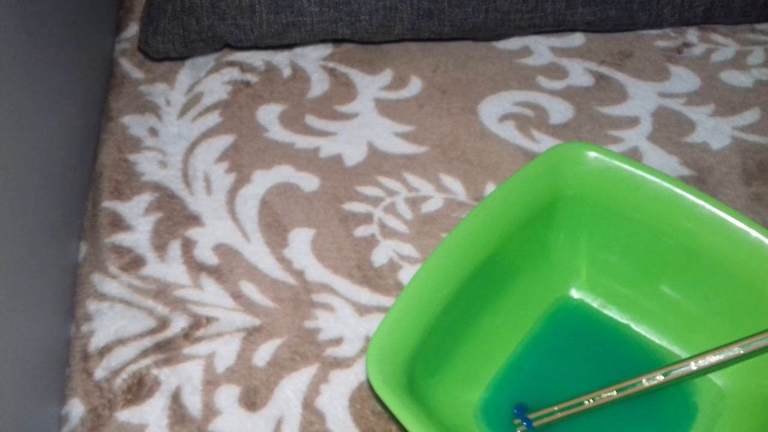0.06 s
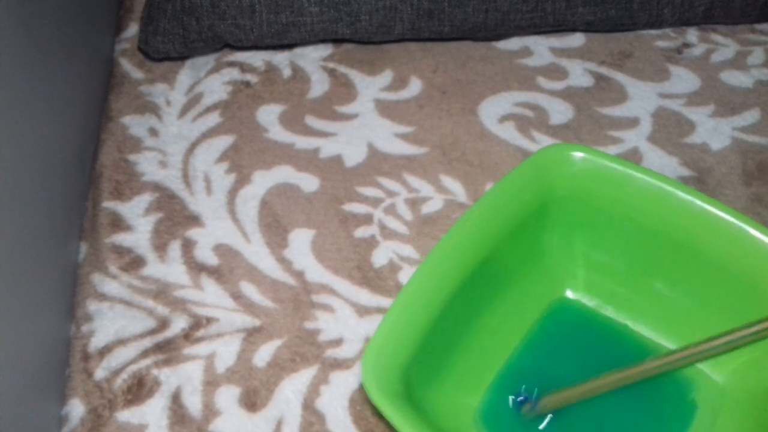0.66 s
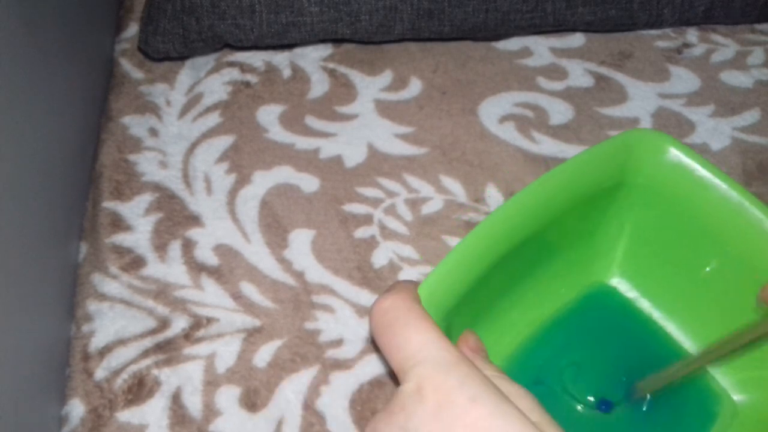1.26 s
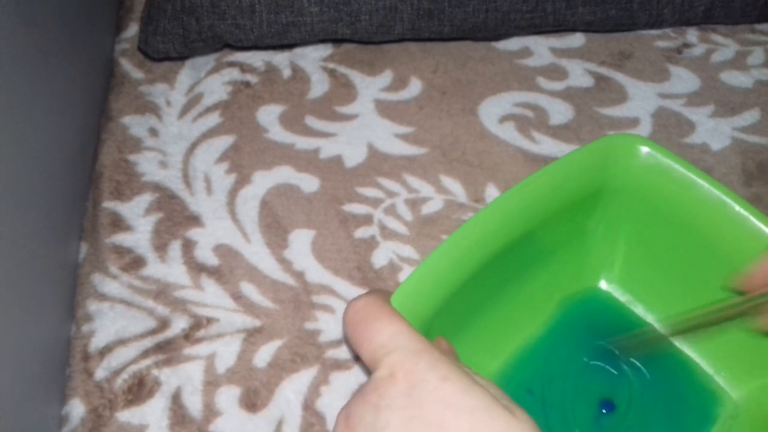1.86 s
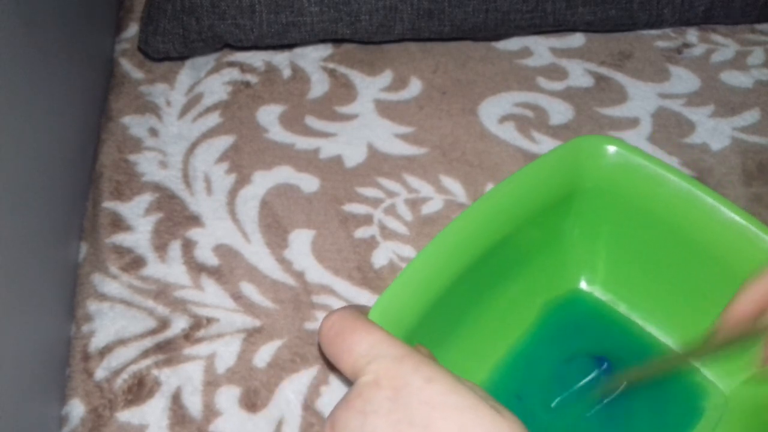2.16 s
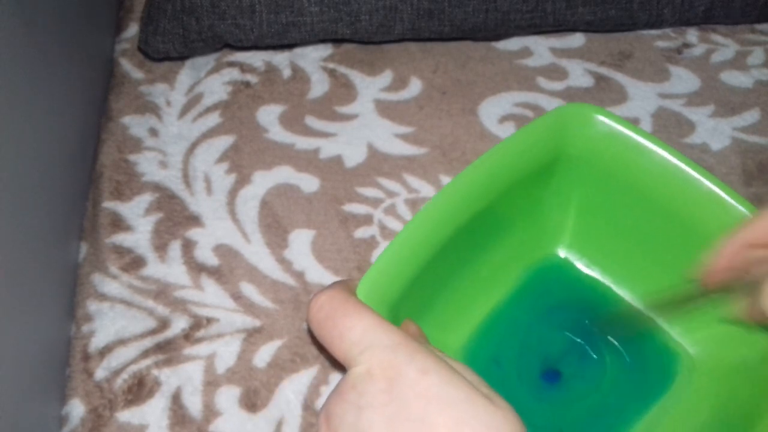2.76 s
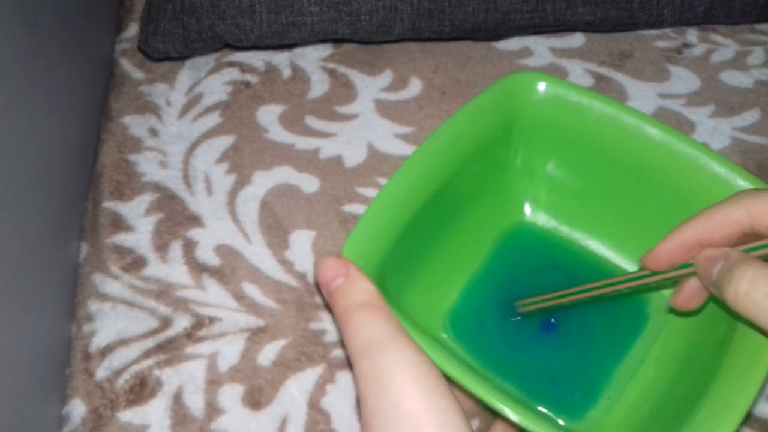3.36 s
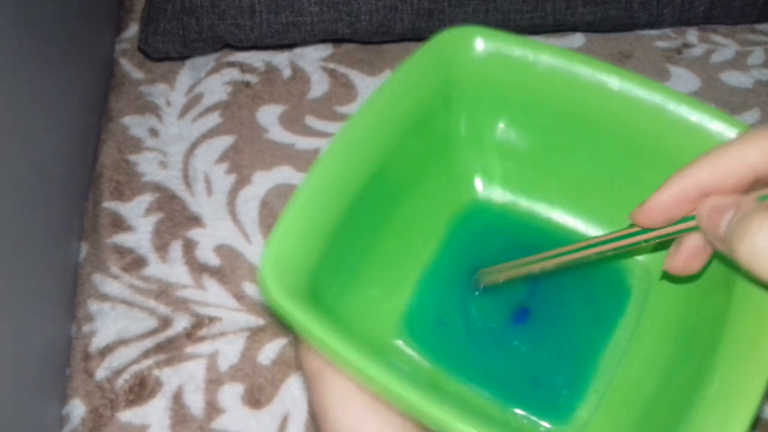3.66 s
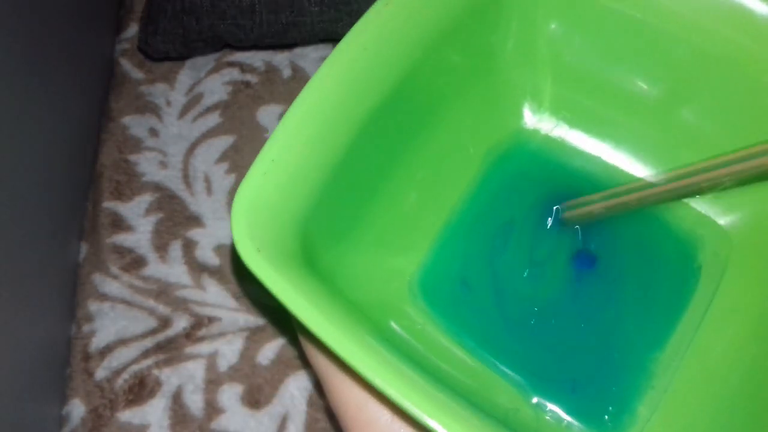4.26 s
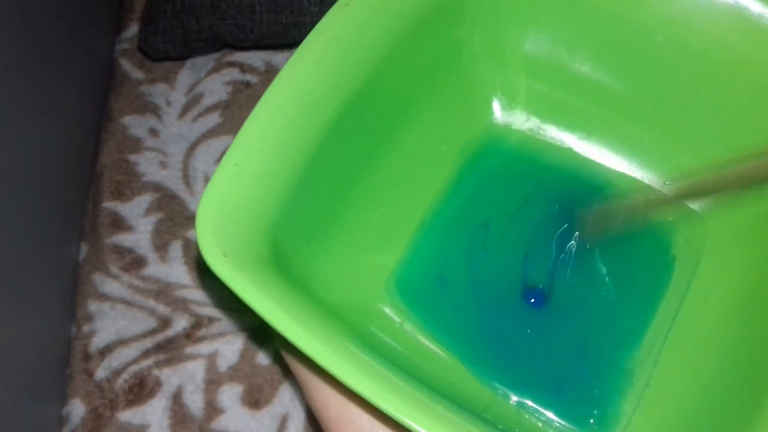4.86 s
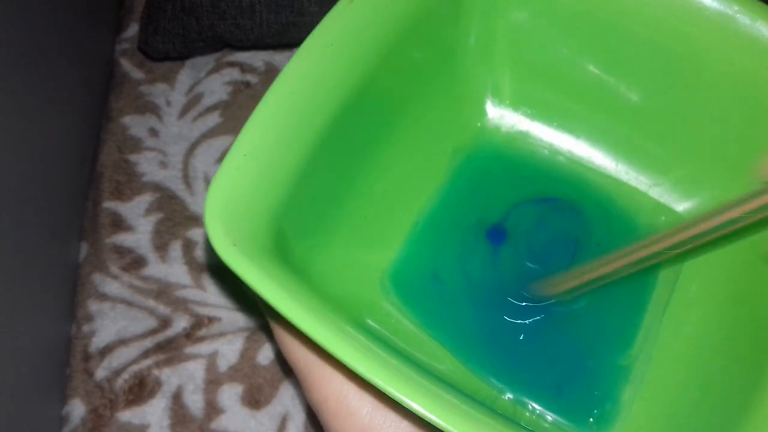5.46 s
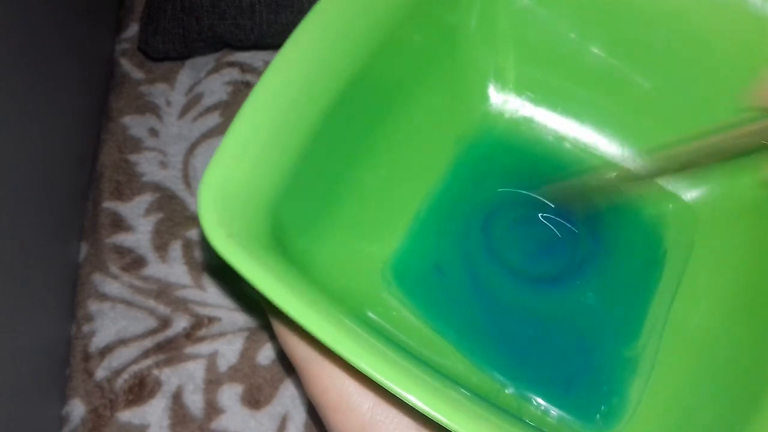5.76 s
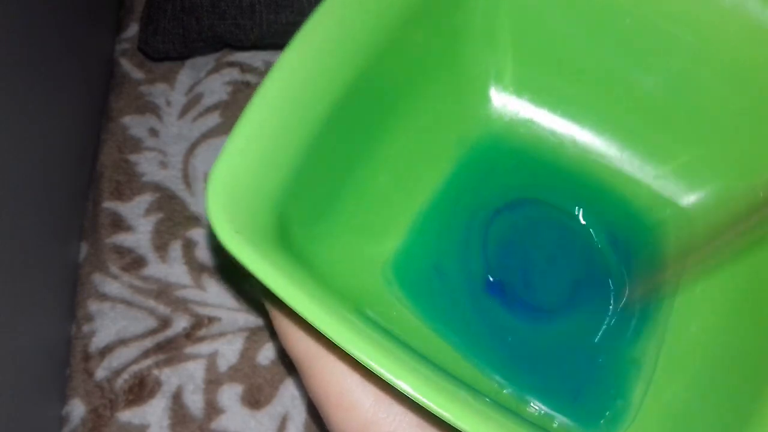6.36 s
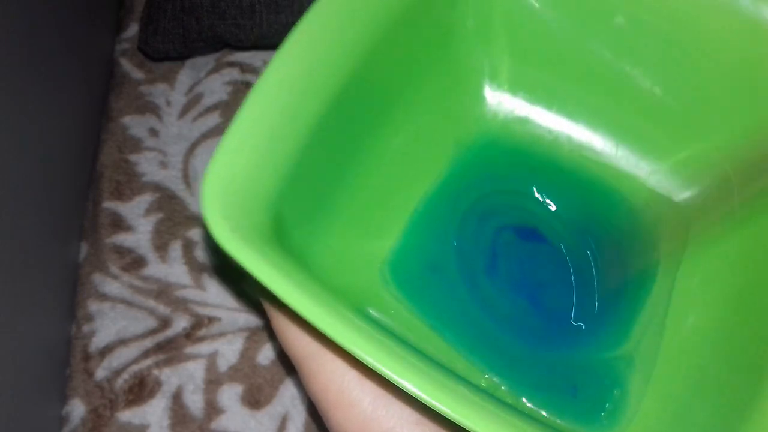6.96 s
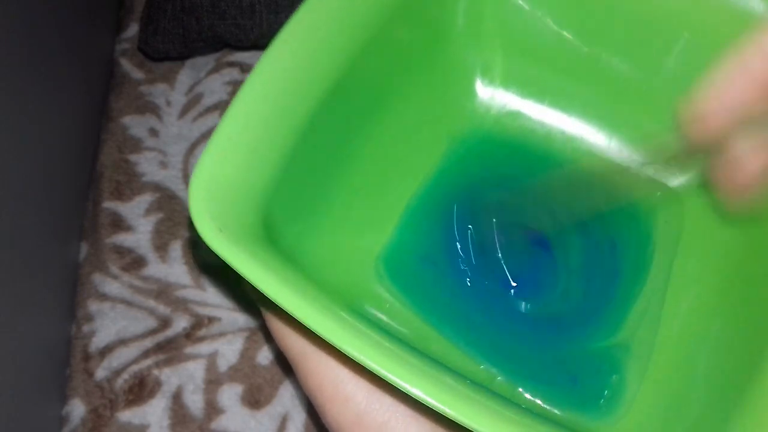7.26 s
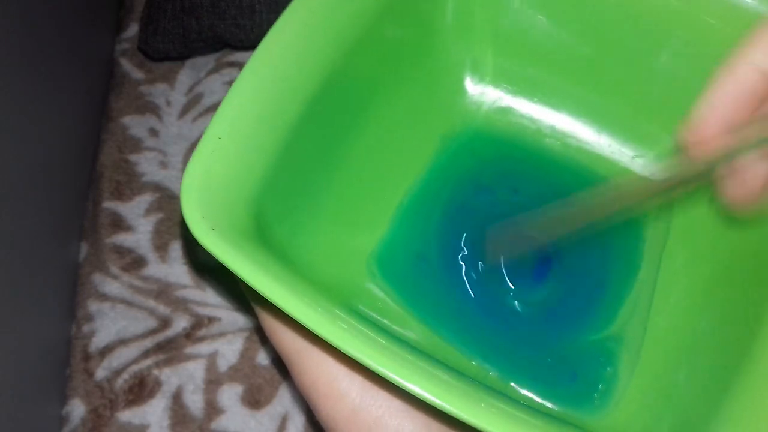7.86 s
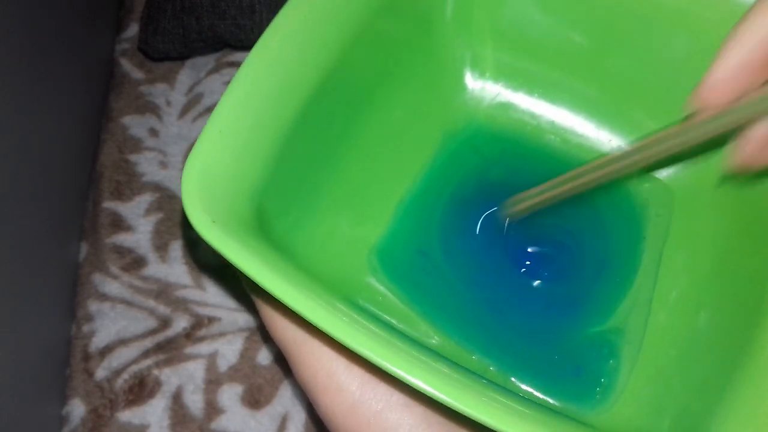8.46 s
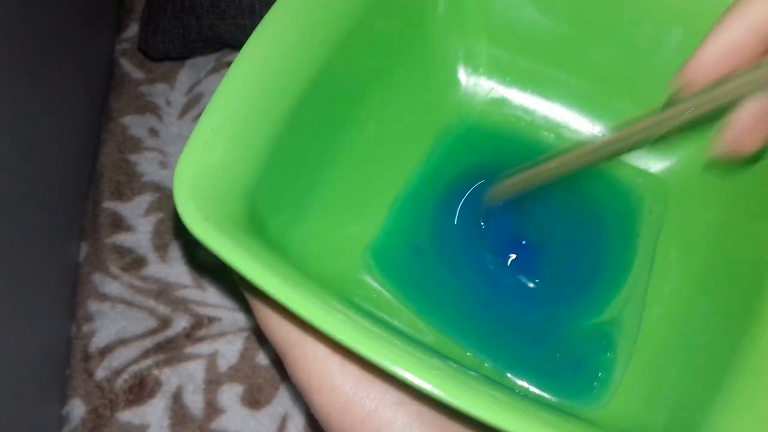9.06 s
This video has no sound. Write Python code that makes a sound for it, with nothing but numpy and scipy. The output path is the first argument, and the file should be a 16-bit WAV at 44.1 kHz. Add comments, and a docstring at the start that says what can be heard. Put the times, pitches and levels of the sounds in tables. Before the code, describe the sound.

Close to the microphone in a small furnished room, a plastic bowl is bumped softly and chopsticks begin dragging through wet slime. Each stroke brings light hollow knocks, a sticky crackle and tiny pops. The stirring briefly gives way to fingers rubbing the plastic and a single sharp swish along the rim, then carries on steadily with more quick taps and wet ticks over a faint hiss.

```python
"""A small furnished room, with a plastic bowl of runny slime close by on a blanket.
A pair of chopsticks knocks the bowl, often twice in quick succession, and drags through the goo: the tips
stick and slip, films of slime snap in a fine sticky crackle and tiny air bubbles burst.
Midway a hand takes hold of the bowl, slides along the rim with one sharp swish and lifts it.
The microphone's peak near 4 kHz adds a bright tick to the bowl's short rings."""
import sys
import numpy as np
from scipy import signal
from scipy.fft import rfft, irfft, next_fast_len
from scipy.io import wavfile
from scipy.ndimage import uniform_filter1d

SR = 44100
rng = np.random.default_rng(int(sys.argv[2]) if len(sys.argv) > 2 else 0)


def inscribe(sig):
    """Save sig as 16-bit PCM at rate SR to the path in sys.argv[1].

    A 1-D sig is mono; a 2-D sig holds one channel per row.
    Samples are clipped to [-1, 1] before scaling.
    """
    pcm = np.round(np.clip(np.atleast_2d(sig).T, -1, 1) * 32767)
    wavfile.write(sys.argv[1], SR, pcm.astype(np.int16))


N = 401751
TIME = np.arange(N) / SR


def undb(db):
    """Decibels to gain."""
    return 10 ** (np.asarray(db) / 20)


def unit(x):
    """Scale to rms 1."""
    return x / np.sqrt(np.mean(x ** 2) + 1e-20)


def decay(t, t60):
    """A fade that falls 60 dB in t60 seconds."""
    return np.exp(-np.log(1000) * t / t60)


def add(out, s, sound):
    """Mix a sound in at s seconds."""
    i = max(int(s * SR), 0)
    out[i:i + len(sound)] += sound[:max(len(out) - i, 0)]


def colour(x, points):
    """EQ by a curve of (Hz, dB) points."""
    hz, db = np.transpose(points)
    size = next_fast_len(len(x))
    bin_hz = np.maximum(np.arange(size // 2 + 1) * SR / size, 1)
    gain = undb(np.interp(np.log(bin_hz), np.log(hz), db))
    return irfft(rfft(x, size) * gain, size)[:len(x)]


def band(x, low_hz, high_hz, order=2):
    """Causal band-pass."""
    return signal.sosfilt(signal.butter(order, [low_hz, high_hz], "band", fs=SR, output="sos"), x)


def walk(rate):
    """Glide between random levels, rate of them a second, at rms 1."""
    hold = max(int(SR / rate), 1)
    steps = np.repeat(rng.standard_normal(N // hold + 1), hold)
    return unit(uniform_filter1d(steps, hold)[:N])


# Low room air, with the microphone's faint peak near 4 kHz. Each row: frequency in Hz, gain in dB.
AIR_EQ = [(25, -18.5), (60, 1.5), (130, 1.5), (450, 1), (1000, -4.5), (2200, -11), (3100, -19),
          (4150, -9.5), (5200, -21), (7000, -29), (15000, -35)]
# The tone of the hiss. Each row: frequency in Hz, gain in dB.
HISS_EQ = [(25, -3.5), (100, 2), (300, 4.5), (1000, 1.5), (4000, -5), (8000, -10), (16000, -10.5)]


def room_tone(air_db=-70, hiss_db=-71.5, rise_db=3, rise_s=1.8):
    """Still air, alike in both ears, under a thin, wide hiss that comes up a little at first."""
    air = undb(air_db) * unit(colour(rng.standard_normal(N), AIR_EQ))
    hiss = np.array([unit(colour(rng.standard_normal(N), HISS_EQ)) for _ in range(2)])
    return air + hiss * undb(hiss_db + rise_db * np.clip(TIME / rise_s, 0, 1))


# The bowl's ringing modes, roughly low to high, plus a bright tick from the microphone's peak near 4 kHz.
# Each row: pitch in Hz, t60 in seconds, relative level in dB.
MODES = [(241, 0.025, -7), (413, 0.023, -7), (535.4, 0.072, -6.5), (650, 0.032, -6), (1000, 0.03, -9),
         (976, 0.022, 7.5), (1082, 0.018, 3.5), (1340, 0.031, -2), (1472, 0.032, -2), (1749.2, 0.016, 3),
         (1950, 0.021, 7), (2125, 0.0056, 17.5), (2390, 0.017, 5.5), (2744, 0.009, 2.5), (3270, 0.0034, -4),
         (3510, 0.0094, -2), (3836, 0.0051, 6), (4173, 0.0094, 6), (4426, 0.0053, 7.5), (4690, .005, 1),
         (5400, 0.0042, -9)]
# Four registers: floor thud, wall, clack and tick. Each row: low edge in Hz, high edge in Hz.
RING_REGISTERS = [(190, 720), (880, 1750), (1750, 3000), (3000, 5400)]


def register_ring(register, weights):
    """One register's resonances ring as damped sines, one ring for each row of mode weights."""
    hz, t60, db = np.transpose(MODES)
    low, high = RING_REGISTERS[register]
    t = TIME[:SR // 12]
    modes = np.sin(2 * np.pi * hz[:, None] * t) * decay(t, t60[:, None])
    inside = (hz > low) & (hz <= high)
    return band((weights * undb(db) * inside) @ modes, low * .9, high * 1.02, order=3)


def immersion(flight_s=0.029, duck=0.67):
    """A gain that ducks as the tips swing almost clear, just before a firm knock opens a group."""
    s, wall_db = np.transpose(CHOPSTICK_KNOCKS)[:2]
    opens_group = (np.diff(s, prepend=0) > .06) & (wall_db > -42.2)
    flying = np.zeros(N)
    for start in s[opens_group]:
        add(flying, start - flight_s, np.ones(int(flight_s * SR)))
    return 1 - duck * uniform_filter1d(flying, SR // 200)


# The faint drag between strokes. Each row: time in seconds, base level in dB.
DRAG_BED = [(0.45, -82), (0.6, -73), (1.2, -82), (1.5, -68), (3.0, -72), (3.9, -74), (5.7, -71), (7.9, -69),
            (8.5, -69.5), (9.1, -70)]
# The hand shifts the bowl. Each row: start and length in seconds, low scrape and high rustle in dB.
HAND_SHIFTS = [(0.487, 0.022, -70, -60.5), (0.602, 0.056, -56, -51), (0.69, 0.077, -61, -63.5),
               (0.783, 0.095, -69, -58), (0.878, .13, -67, -59.5), (1.02, .045, -59.5, -58),
               (1.228, .015, -64.5, -60.5), (3.123, 0.065, -65, -55), (3.458, 0.085, -70, -55.5),
               (3.576, 0.022, -63, -44), (3.601, 0.089, -55.5, -51), (3.802, 0.023, -72, -53.5),
               (3.923, 0.067, -67, -59)]
# Strokes through the slime. Each row: start and length in seconds, scrape and crackle in dB.
STIR_STROKES = [(1.352, 0.055, -58.5, -56.5), (1.481, .145, -59, -57), (1.66, 0.073, -60, -55.5),
                (1.828, 0.044, -63, -55.5), (1.917, .11, -62.5, -57.5), (2.072, 0.053, -57, -58.5),
                (2.25, 0.048, -50, -53), (2.429, 0.064, -54, -52.5), (2.616, 0.056, -53.5, -58),
                (2.705, 0.039, -56, -53.5), (2.799, 0.16, -57.5, -55), (2.998, 0.059, -56, -56.5),
                (4.04, 0.14, -59.5, -63.5), (4.302, 0.11, -59.5, -60.5), (4.489, 0.057, -53.5, -54),
                (4.58, 0.2, -54.5, -55), (4.81, 0.11, -54.5, -53.5), (4.996, 0.12, -52.5, -60),
                (5.294, .06, -55.5, -61.5), (5.382, 0.12, -56.5, -57), (5.553, 0.082, -57.5, -56.5),
                (5.651, .12, -54.5, -56), (5.833, 0.088, -54, -56), (5.934, 0.13, -57, -53.5),
                (6.117, 0.15, -56.5, -55.5), (6.378, .11, -56.5, -55.5), (6.584, .085, -55, -57),
                (6.784, .1, -55.5, -54), (6.994, 0.086, -53.5, -54.5), (7.111, 0.032, -58, -60.5),
                (7.214, 0.14, -55.5, -53.5), (7.381, 0.15, -56.5, -53.5), (7.526, 0.16, -56.5, -53.5),
                (7.801, 0.14, -54, -54), (7.937, 0.12, -55, -54.5), (8.107, 0.15, -54.5, -54),
                (8.346, 0.085, -59, -57), (8.568, 0.11, -56.5, -56.5), (8.768, 0.083, -53.5, -56.5),
                (8.949, 0.16, -57, -56.5)]


def stroke_envelopes(attack_s=0.012, release_s=0.014, settle_db=-4, settle_db_per_s=94):
    """Scrape and crackle gains: each stroke sets in, holds and lets go, then the slime creeps back."""
    immersed = immersion()
    fade_in = np.clip((TIME - DRAG_BED[0][0]) / .04, 0, 1)
    drag = immersed * undb(np.interp(TIME, *np.transpose(DRAG_BED))) * fade_in
    scrape, crackle = drag * undb(4.5), drag * undb(7)
    for s, length, scrape_db, crackle_db in STIR_STROKES + HAND_SHIFTS:
        near = slice(int((s - .1) * SR), int((s + .7) * SR))
        since = TIME[near] - s
        attack = np.clip(since / attack_s + .5, 0, 1)
        release = np.clip((length - since) / release_s + .5, 0, 1)
        settle = immersed[near] * undb(settle_db - settle_db_per_s * np.maximum(since - length, 0))
        shape = attack * np.maximum(release, settle)
        scrape[near] = np.maximum(scrape[near], shape * undb(scrape_db))
        crackle[near] = np.maximum(crackle[near], shape * undb(crackle_db))
    return scrape, crackle


def grains(per_s, spread_db):
    """Random tiny impulses, mostly small, now and then larger."""
    size_db = spread_db * np.minimum(rng.exponential(size=N), 4)
    return (rng.random(N) < per_s / SR) * rng.choice([-1, 1], N) * undb(size_db)


# The crossfade from smooth skin to grainy goo. Each row: time in seconds, goo amount from 0 to 1.
STICKINESS = [(1.2, 0.12), (1.35, 0.95), (3.05, 0.91), (3.15, 0.2), (3.95, 0.5), (4.05, 0.96)]
# The tone of the wet tearing layer. Each row: frequency in Hz, gain in dB.
SLIME_EQ = [(300, -38), (900, -20.5), (2000, -4), (3000, -7), (4300, 5), (5300, -9), (6500, -18.5),
            (8500, -26.5), (15000, -32)]


def stirring(grains_per_s=540, spread_db=4.5, clump_db=3.5, smear=0.91, wet_db=-6, slosh_db=-20):
    """Tips and hand stick and slip at eight spots on the bowl while films of slime snap in clumps."""
    scrape, crackle = stroke_envelopes()
    clumps = unit(undb(clump_db * walk(90)))
    sticky = np.clip(np.interp(TIME, *np.transpose(STICKINESS)), 0, 1)
    slips = unit(np.array([grains(grains_per_s / 8, spread_db) * clumps for _ in range(8)]))
    slips = sticky * slips + np.sqrt(1 - sticky ** 2) * rng.standard_normal(slips.shape)
    # deep in the goo a slip is a hollow pop, at the surface a bright tick
    depth = np.linspace(-1, 1, len(slips))[:, None]
    is_low = np.transpose(MODES)[0] < RING_REGISTERS[1][1]
    tilt_db = 4 * depth * np.where(is_low, 1, -1)
    weights = rng.choice([-1, 1], tilt_db.shape) * undb(tilt_db)
    body = np.zeros(N)
    for register, (drive, db) in enumerate([(scrape, -18), (scrape, -0.5), (scrape, -7), (crackle, -4)]):
        rings = signal.oaconvolve(slips, register_ring(register, weights), axes=1)
        body += drive * undb(db) * unit(rings.sum(axis=0)[:N])
    surface_slips = unit(slips[depth[:, 0] < 0].sum(axis=0))
    films = surface_slips + smear * clumps * rng.standard_normal(N)
    tearing = unit(colour(films, SLIME_EQ))
    slosh = unit(band(rng.standard_normal(N) * clumps, 192, 305))
    return body + crackle * undb(wet_db) * tearing + scrape * undb(slosh_db) * slosh


# Fingers on the plastic. Each row: start and length in seconds, pitch in Hz, level in dB.
FINGER_RUBS = [(0.454, 0.036, 600, -58.5), (0.618, 0.035, 900, -50.5), (0.976, 0.026, 730, -54),
               (1.01, 0.082, 700, -54), (3.197, 0.066, 930, -49), (3.275, 0.036, 685, -43.5),
               (6.905, 0.072, 240, -60)]


def finger_rubs():
    """Skin rubs the bowl in soft, rounded bursts of friction noise."""
    out = np.zeros(N)
    for s, length, hz, db in FINGER_RUBS:
        friction = unit(band(rng.standard_normal(SR // 3), hz * 0.64, hz * 1.35))[:int(length * SR)]
        add(out, s, undb(db) * friction * np.sqrt(np.hanning(len(friction))))
    return out


# The chopsticks hit the bowl. Each row: start in seconds, wall level in dB before trim, strongest wall
# pitch in Hz, then thud, brightness and second touch in dB relative to the wall.
CHOPSTICK_KNOCKS = [(0.536, -63, 1250, 1, 6, -20), (0.609, -52.5, 1380, -1, -3.5, 1.5),
                    (0.685, -37, 1800, -21, 1, -25), (1.284, -46.5, 940, -9.5, -20, -23),
                    (1.357, -41, 970, -20, -25, -23), (1.551, -44, 970, -20, -16, -14),
                    (1.664, -47.5, 960, -13.5, -14, -19), (1.834, -37, 980, -12, -13.5, -22),
                    (2.107, -49.5, 1010, -30, -14, -8), (2.269, -31.5, 1180, -35, -19, -1.5),
                    (2.276, -28.5, 1260, -23, -19, -24), (2.446, -30, 1280, -25, -14.5, -5.5),
                    (3.141, -45.5, 1050, -9, -9.5, -12), (3.208, -49.5, 890, -7, -6, -10),
                    (3.289, -47.5, 1040, -7, 0.5, -8), (3.488, -42.5, 1150, -11.5, -11.5, -17),
                    (3.609, -43, 1040, -9, -3, -11), (3.666, -47, 950, -4.5, 1.5, -9),
                    (3.756, -42, 980, -18, -11, -3), (3.901, -46.5, 980, -15, -18, -27),
                    (4.041, -42.5, 1030, -19, -14, -24), (4.136, -36, 1070, -14.5, -23, -4.5),
                    (4.330, -36.5, 1080, -15.5, -12.5, 7.5), (4.415, -38.5, 1010, -18, -14, -28),
                    (4.489, -25, 1020, -16.5, -10, -32), (4.514, -31, 1160, -25, -15, 0),
                    (4.600, -30, 1010, -20.5, -17, 2), (4.645, -34.5, 1000, -11, -16, -3),
                    (4.695, -31.5, 1030, -21, -14, 3), (4.741, -30.5, 1360, -11.5, -22, -12),
                    (4.812, -45.5, 1210, -32, -12, -3), (4.893, -31.5, 1080, -18.5, -19, -1),
                    (5.055, -35, 1230, -17, -8.5, -6), (5.113, -40.5, 1190, -9, -19, -24),
                    (5.148, -42.5, 970, -23, -18, -25), (5.262, -36, 1260, -17, -12.5, -33),
                    (5.341, -44, 1010, -25, -19, -21), (5.382, -48.5, 1120, -25, -2, -9),
                    (5.413, -35, 1180, -15.5, -14.5, -6), (5.449, -42, 1310, -14.5, -19, -24),
                    (5.517, -44, 980, -20, -18, -23), (5.553, -42, 1310, -35, -12, -14),
                    (5.686, -44.5, 990, -35, -13.5, -10), (5.885, -44.5, 980, -24, -10.5, -7),
                    (6.073, -40.5, 990, -25, -12, -10), (6.117, -44, 1210, -27, -7, -7),
                    (6.243, -40, 1000, -28, -12, -2), (6.310, -47.5, 1000, -18, -5.5, -20),
                    (6.435, -45.5, 960, -25, -4.5, 2), (6.579, -40, 1080, -11.5, -5.5, -26),
                    (6.645, -50, 1030, -30, -3, -6), (6.854, -45.5, 1030, -24, -6, -19),
                    (6.983, -36, 1060, -15.5, -13, -26), (7.053, -43.5, 980, -28, -7.5, -9),
                    (7.178, -40, 960, -16, -14.5, -21), (7.217, -48.5, 1000, -30, -23, -5),
                    (7.458, -44.5, 970, -35, -14, -13), (7.653, -41.5, 1020, -26, -13, -17),
                    (7.998, -46.5, 1210, -10.5, -2.5, -12), (8.172, -36, 1040, -13.5, -17, -28),
                    (8.203, -39.5, 1050, -16.5, -14, -3.5), (8.373, -35, 1270, -43, -20, -2),
                    (8.393, -31.5, 1260, -18, -18.5, -35), (8.425, -48, 990, -18, -17, -17),
                    (8.563, -32, 1070, -15.5, -16, -16), (8.688, -50.5, 1000, -23, -4, -21),
                    (8.745, -38.5, 1060, -13.5, -20.5, -11)]


def knock_hits(second_touch_s=0.012, clack_db=1.0, tick_db=0.75):
    """The pair lands in quick succession. A hit is (s, wall dB, Hz, relative thud, clack, tick dB)."""
    return [(s + lag, db + touch_db, hz, thud_db, bright_db + clack_db, bright_db + tick_db)
            for s, db, hz, thud_db, bright_db, second_db in CHOPSTICK_KNOCKS
            for lag, touch_db in ((0, 0), (second_touch_s, second_db))]


def contact_force(hardness_db, chatter=0.16, hard_s=0.0013, soft_s=0.0058,
                  rebound=0.47, rebound_s=0.002196):
    """A blow, a quick rebound, and chatter that lasts longer when slime cushions the hit."""
    t = TIME[:SR // 50]
    count = len(hardness_db)
    chatter_s = np.interp(hardness_db, [-47, -39], [soft_s, hard_s])
    slips = unit(rng.standard_normal((count, len(t))) ** 3)
    force = chatter * slips * np.exp(-t / chatter_s[:, None])
    force[:, 0] += 1
    lag = (rebound_s * SR * rng.uniform(.75, 1.25, count)).astype(int)
    force[np.arange(count), lag] += rebound
    return force


# The floor is muffled on the blanket and rings once lifted. Each row: time in seconds, mode gain in dB.
FLOOR_LIFT = [(3.3, -5), (3.9, 3.5)]


def struck_bowl(hits, focus_hz=330, off_pitch=0.35, detune=0.016, trim_db=(1, 1.5, 1, 1)):
    """Each hit rings the bowl, with a bright tick on top; where it lands decides which modes speak."""
    s, wall_db, pitch_hz, thud_db, clack_db, tick_db = np.transpose(hits)
    hz = np.transpose(MODES)[0]
    # neighbouring modes start in opposite directions, so the ring takes a cycle or two to build
    weights = (-1) ** np.arange(len(hz)) * undb(2.5 * rng.standard_normal((len(s), len(hz))))
    weights[:, 2] *= undb(np.interp(s, *np.transpose(FLOOR_LIFT)))  # the floor's mode
    wall_focus = off_pitch + np.exp(-((hz - pitch_hz[:, None]) / focus_hz) ** 2)
    # a blow that thuds or clacks has met bare plastic
    force = contact_force(wall_db + np.maximum(0, np.maximum(thud_db + 16, clack_db + 8)))
    # the grip and the sloshing load detune the bowl a little
    speeds = 1 + detune * rng.standard_normal(len(s))
    out = np.zeros(N)
    for register, relative_db in enumerate([thud_db, 0, clack_db, tick_db]):
        focus = wall_focus if register == 1 else 1
        rings = signal.fftconvolve(register_ring(register, weights * focus), force, axes=1)
        strength = np.sqrt(np.sum(rings ** 2, axis=1) / (.008 * SR))  # rms as if packed into 8 ms
        gains = undb(wall_db + relative_db + trim_db[register]) / strength
        n = np.arange(rings.shape[1])
        for start, gain, ring, speed in zip(s, gains, rings, speeds):
            add(out, start, gain * np.interp(n * speed, n, ring))
    return out


# The tips click on the dry rim, then slime dulls them. Each row: time in seconds, crack gain in dB.
TIP_DRYNESS = [(.7, 5), (1.2, -8.5)]
# The tone of a chopstick on bare plastic. Each row: frequency in Hz, gain in dB.
CRACK_EQ = [(400, -30), (1000, 1), (1700, 6), (2300, -5), (2950, 8.5), (3800, 4), (4800, 3.5),
            (6500, -13.5), (8000, -27), (15000, -41)]


def chopstick_cracks(hits, decay_s=0.00087):
    """A very short broadband snap at first touch, louder on hits that clack."""
    out, t = np.zeros(N), TIME[:SR // 160]
    for s, wall_db, _, _, clack_db, _ in hits:
        snap = unit(rng.standard_normal(len(t)) * np.exp(-t / decay_s))
        dry_db = np.interp(s, *np.transpose(TIP_DRYNESS))
        add(out, s, undb(wall_db + clack_db + dry_db) * snap)
    return colour(out, CRACK_EQ)


# Soft, low bumps. Each row: start in seconds, pitch in Hz, t60 in seconds, level in dB.
SOFT_BUMPS = [(0.546, 56.4, 0.18, -55), (0.61, 208, 0.047, -39), (.612, 86, .06, -60),
              (0.621, 267, 0.029, -40), (.66, 131, 0.074, -53), (1.476, 340, 0.022, -45),
              (1.50, 75.4, 0.32, -63), (3.126, 188, .04, -51), (3.563, 484, 0.017, -46),
              (3.673, 191, 0.052, -47)]


def bumps():
    """The bowl and its seat take dull bumps, each one damped sine."""
    out, t = np.zeros(N), TIME[:SR // 3]
    for s, hz, t60, db in SOFT_BUMPS:
        add(out, s, undb(db) * np.sin(2 * np.pi * hz * t) * decay(t, t60))
    return out


def graze_hits(over_db=4, spread_db=2, pitch_hz=1080, scatter=0.1, thud_db=-25, clack_db=-11, tick_db=-7):
    """Somewhere in each stroke a tip grazes the wall, a little louder than its scrape."""
    chance = rng.uniform(-1, 1, (len(STIR_STROKES), 3))
    return [(s + length * (1 + when) / 2, db + over_db + spread_db * size,
             pitch_hz * (1 + scatter * place), thud_db, clack_db, tick_db)
            for (s, length, db, _), (when, size, place) in zip(STIR_STROKES, chance)]


def bubbles(count=5, pitch_hz=4200, octaves=0.28, t60=0.01, glide_per_s=4, over_db=8, spread_db=4):
    """A few tiny air bubbles burst in every stroke, each a short ring that rises in pitch."""
    out, t = np.zeros(N), TIME[:SR // 30]
    envelope = decay(t, t60) * (1 - np.exp(-t / 0.00062))
    for s, length, _, crackle_db in STIR_STROKES:
        for when, tuning, loudness in rng.uniform(-1, 1, (count, 3)):
            hz = pitch_hz * 2 ** (octaves * tuning)
            chirp = np.sin(2 * np.pi * hz * t * (1 + glide_per_s * t / 2))
            gain = undb(crackle_db + over_db + spread_db * loudness)
            add(out, s + length * (1 + when) / 2, gain * envelope * chirp)
    return out


# The larger films of slime snapping. Each row: start in seconds, tick level in dB before trim.
FILM_SNAPS = [(1.457, -46), (1.566, -41.5), (1.914, -49.5), (2.009, -49.5), (5.811, -45), (6.151, -48.5),
              (6.538, -47.5), (7.341, -49), (7.540, -46), (7.737, -43.5), (8.035, -44.5), (8.131, -45.5),
              (8.904, -46), (9.098, -50)]


def film_snap_hits(pitch_hz=1080, tick_db=7, thud_db=-17, clack_db=-5):
    """A film of slime breaks: mostly bright tick, with little of the bowl's wall."""
    return [(s, db - tick_db, pitch_hz, thud_db, clack_db, tick_db) for s, db in FILM_SNAPS]


def swell(peak_s, db, rise_db_per_s, fall_db_per_s):
    """Gain that climbs to a peak and falls away."""
    drop_db = np.maximum(rise_db_per_s * (peak_s - TIME), fall_db_per_s * (TIME - peak_s))
    return undb(db - np.minimum(drop_db, 120))


# The tone of the swish. Each row: frequency in Hz, gain in dB.
SWISH_EQ = [(410, -79), (700, -40), (1070, -21.5), (1250, -32), (1740, -21), (2220, -17.5), (3100, -15.5),
            (3520, -6), (3950, -12), (4270, -0.5), (4790, -14), (5960, -27), (15000, -55.5)]


def hand_swish(start_s=3.21, grip_s=3.351, grit_db=3.5, squeak_db=-24):
    """The hand slides along the rim, a gritty swish that builds to a spike as it grips."""
    slide = swell(grip_s, db=-33, rise_db_per_s=150, fall_db_per_s=621) * (TIME > start_s)
    grip = swell(grip_s, db=-21, rise_db_per_s=1100, fall_db_per_s=1599)
    slips = rng.standard_normal(N) * undb(grit_db * walk(600))
    skin = unit(colour(slips, SWISH_EQ))
    squeak = undb(squeak_db) * unit(band(slips, 5100, 7000))
    return (skin + squeak) * (slide + grip)


# The tone of the room's answer. Each row: frequency in Hz, gain in dB.
REVERB_EQ = [(100, -8), (500, 5.5), (1000, -2), (2000, -2), (3000, 2.5), (4300, -1), (7000, -1),
             (15000, 2.5)]


def room_reverb(x, t60=0.26, send_db=-15, gap_s=0.003):
    """A short soft tail from the walls and furniture."""
    t = TIME[:SR // 2]
    tail = rng.standard_normal(len(t)) * decay(t, t60) * np.clip(t / gap_s - 1, 0, 1)
    tail = colour(tail / np.sqrt(np.sum(tail ** 2)), REVERB_EQ)
    return undb(send_db) * signal.oaconvolve(x, tail)[:N]


def scene():
    """The bowl and its reverb sit dead centre, over the room tone."""
    hits = knock_hits() + film_snap_hits() + graze_hits()
    bowl = struck_bowl(hits) + chopstick_cracks(hits) + stirring() + bubbles()
    bowl += finger_rubs() + bumps() + hand_swish()
    return bowl + room_reverb(bowl) + room_tone()


def record(dry, top_hz=15750):
    """A steep low-pass shaves off the very top."""
    return signal.sosfilt(signal.ellip(10, .2, 70, top_hz, fs=SR, output="sos"), dry)


dry = scene()
out = record(dry)
inscribe(out)
```